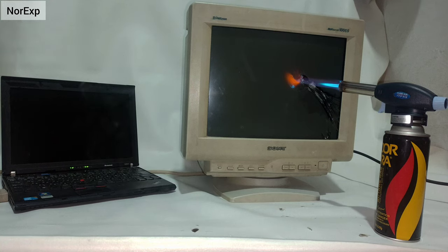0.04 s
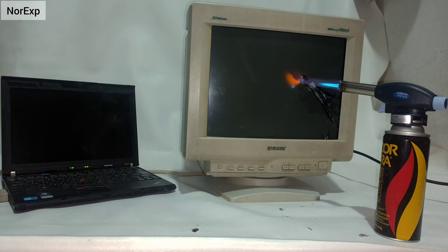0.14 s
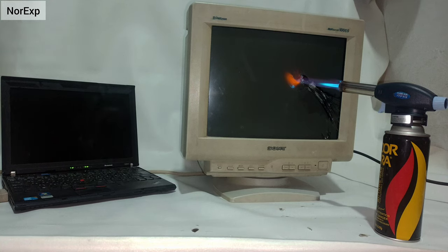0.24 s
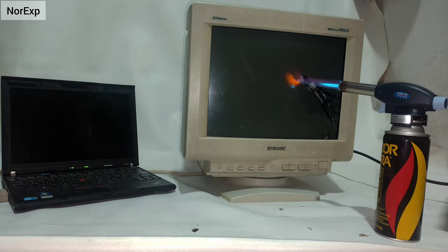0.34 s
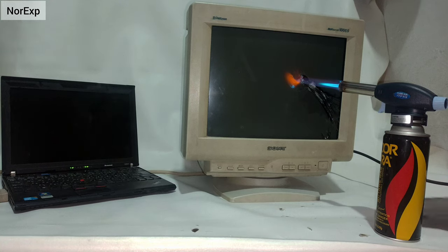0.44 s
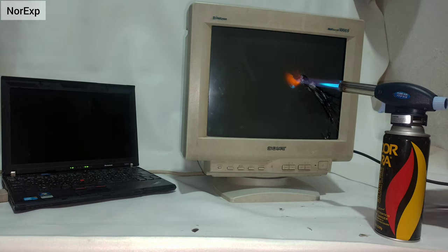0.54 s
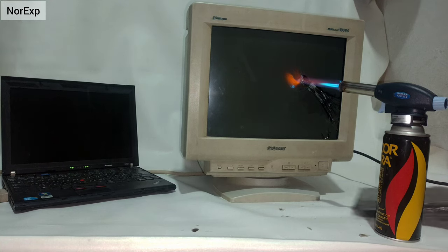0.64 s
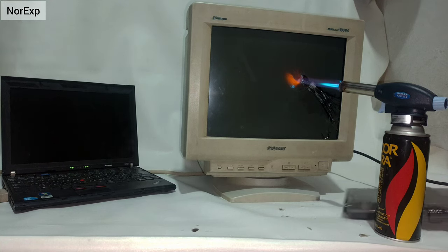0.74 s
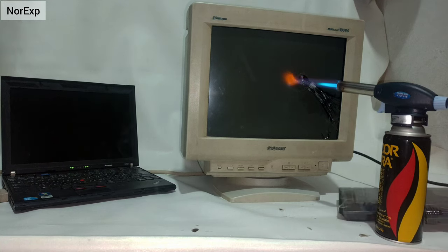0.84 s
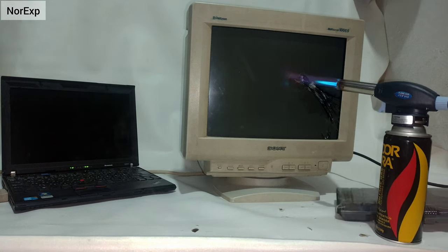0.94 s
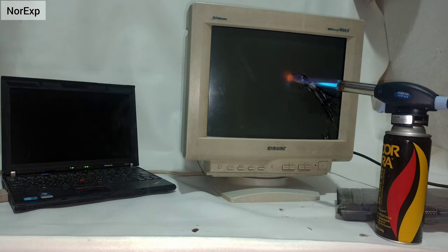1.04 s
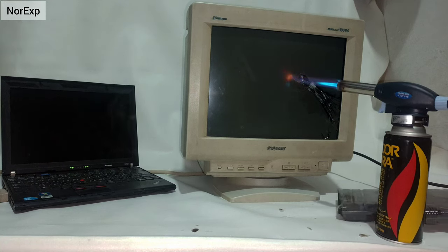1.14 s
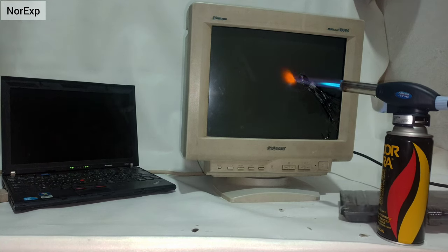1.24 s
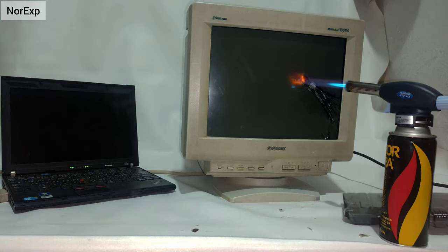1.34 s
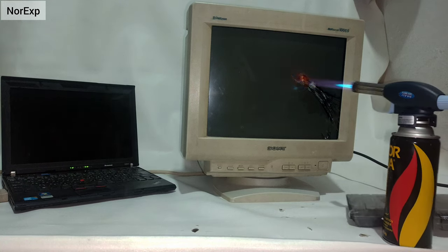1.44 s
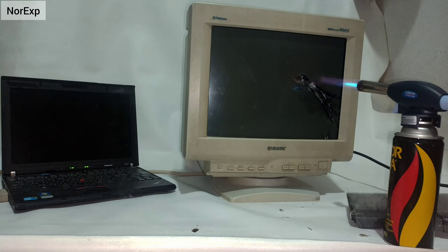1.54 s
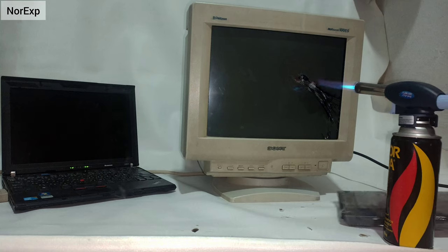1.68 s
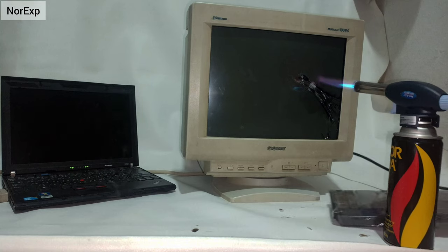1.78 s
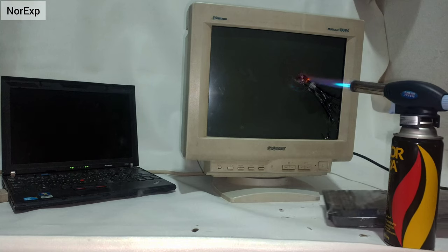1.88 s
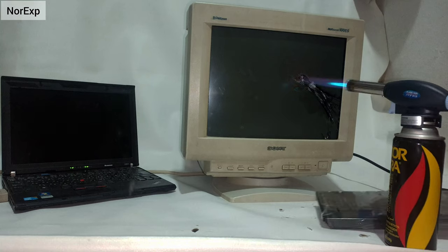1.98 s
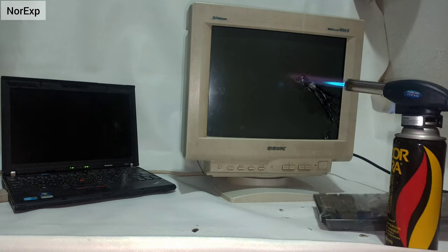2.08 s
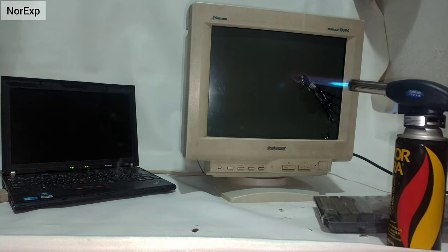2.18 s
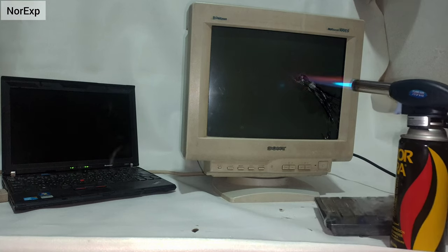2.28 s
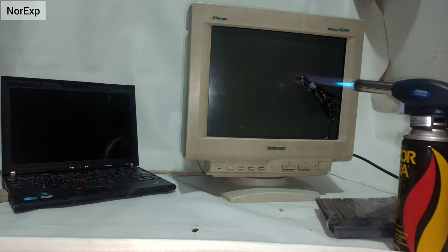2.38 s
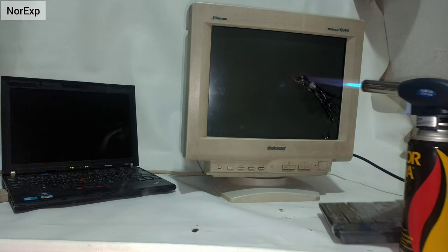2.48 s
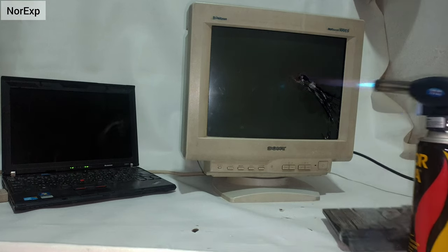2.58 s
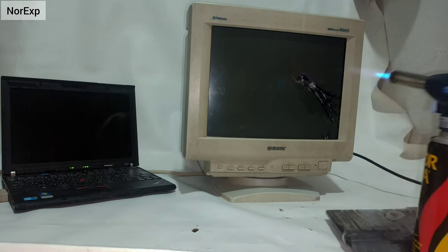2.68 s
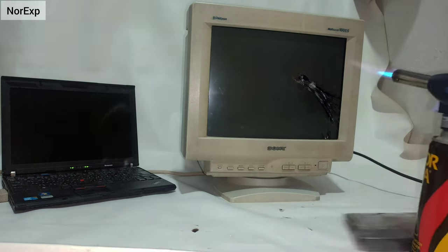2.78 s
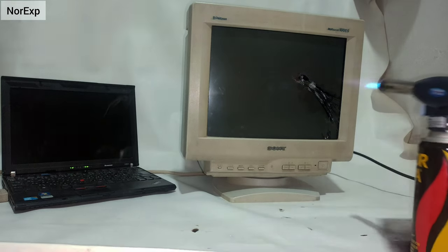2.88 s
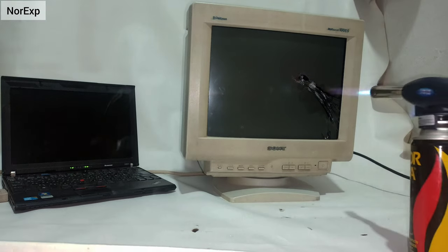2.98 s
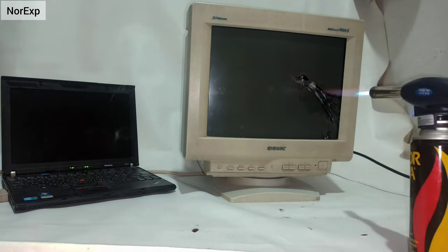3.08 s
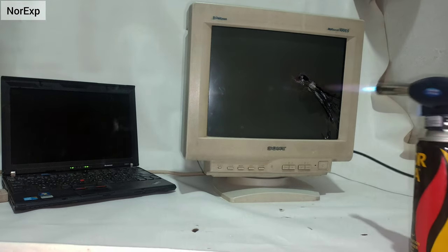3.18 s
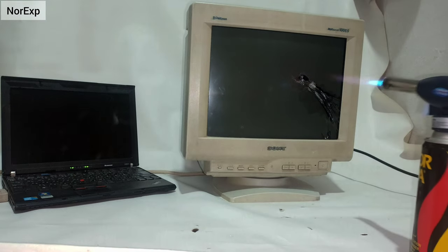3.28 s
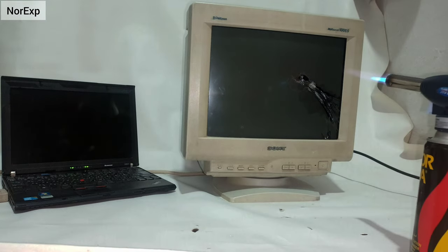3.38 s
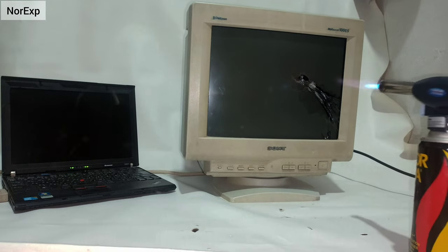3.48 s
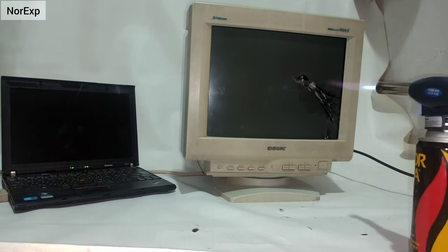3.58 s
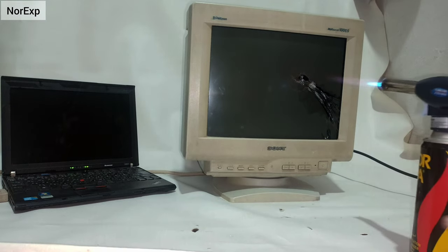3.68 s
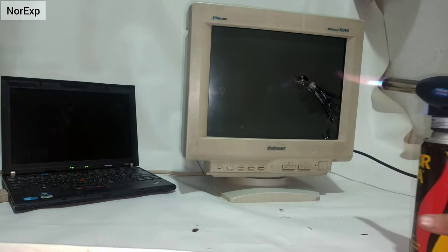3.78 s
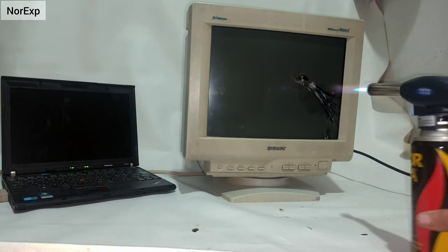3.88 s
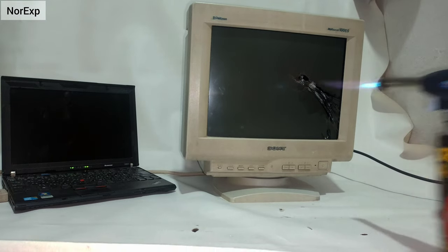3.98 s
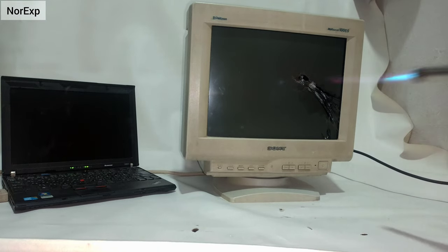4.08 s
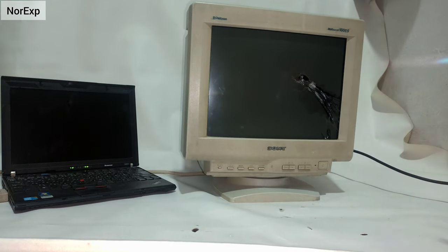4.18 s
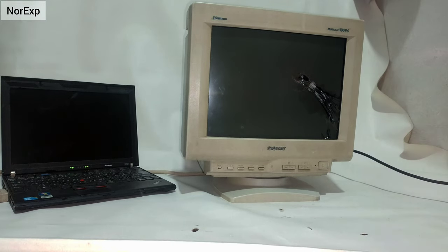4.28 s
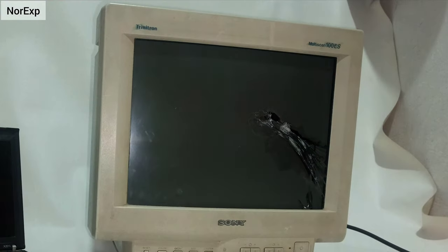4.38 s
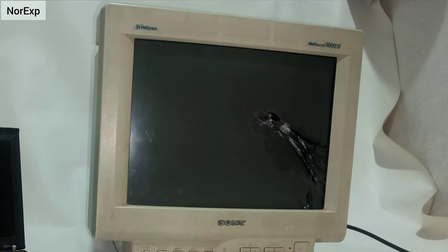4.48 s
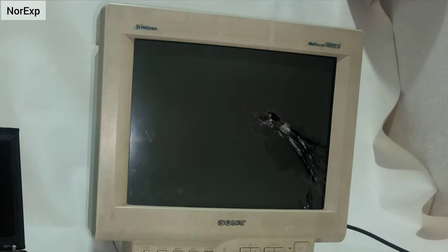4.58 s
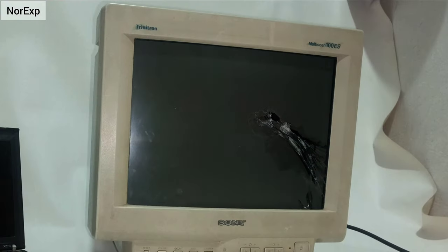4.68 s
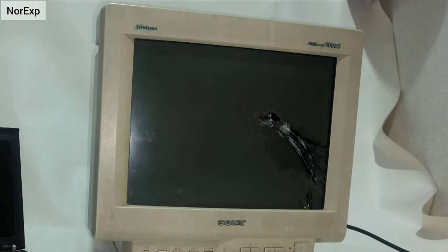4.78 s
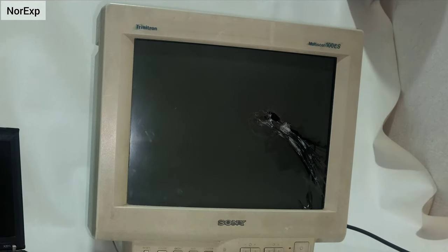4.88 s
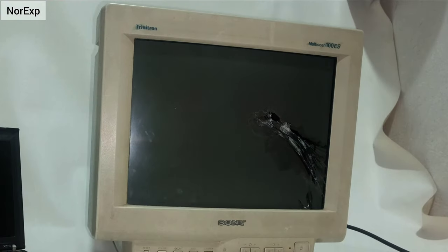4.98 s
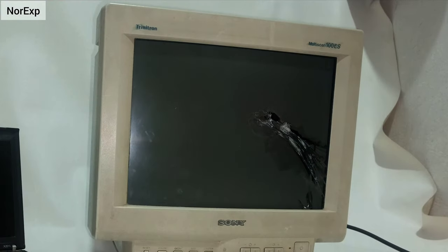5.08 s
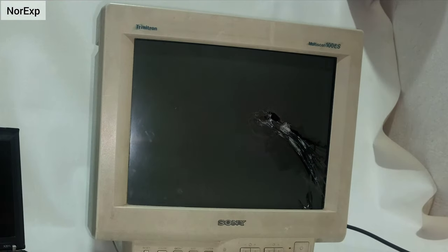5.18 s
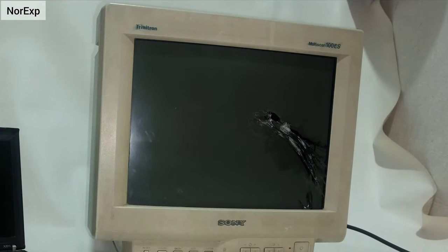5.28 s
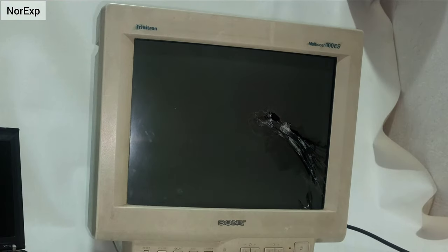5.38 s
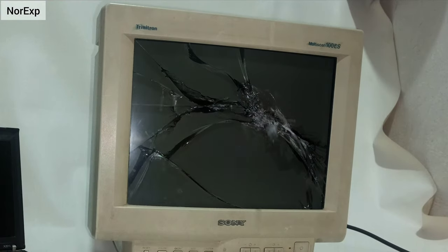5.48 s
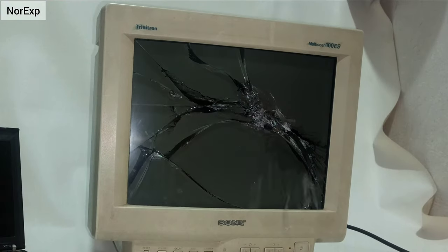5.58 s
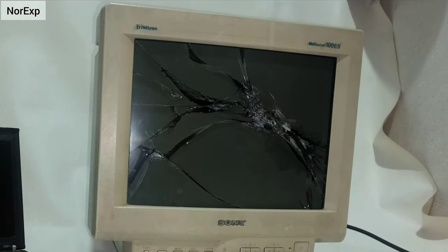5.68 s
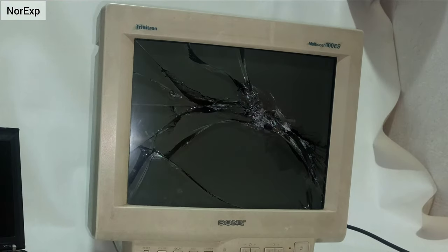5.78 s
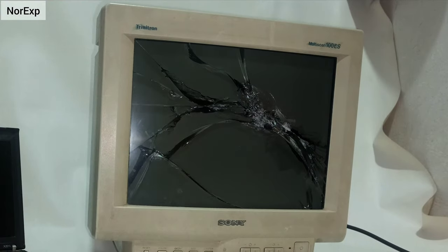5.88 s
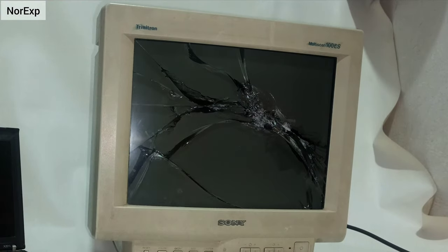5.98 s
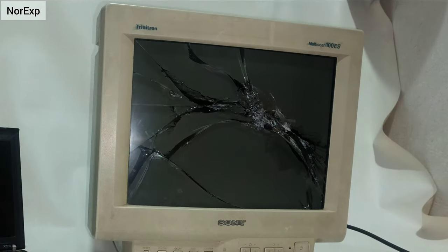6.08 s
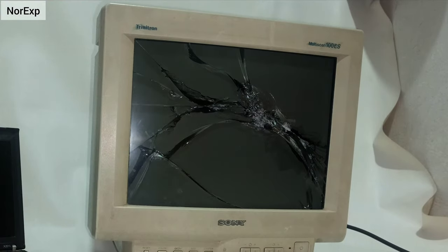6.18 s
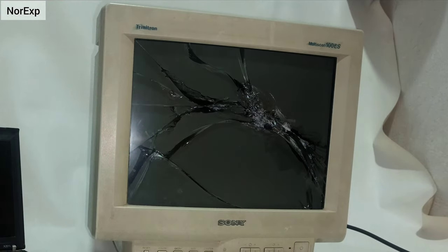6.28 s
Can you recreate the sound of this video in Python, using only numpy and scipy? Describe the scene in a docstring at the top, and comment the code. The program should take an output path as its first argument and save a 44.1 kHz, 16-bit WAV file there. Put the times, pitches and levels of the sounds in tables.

```python
"""One microphone in a small room. A butane torch roars and hisses 12 cm from the screen of a picture tube.
A soft handling knock, then the heated glass pings. The torch draws back to 32 cm amid ticks and clicks
of hot glass and handled torch. At 4.3 s the gas is shut off, leaving a low rumble and a few faint ticks.
At 5.5 s the screen bursts with a snap and a thud, air rushes into the vacuum and splinters rattle
inside the tube. At 6.1 s the screen cracks again."""
import sys
import numpy as np
from scipy import signal
from scipy.fft import rfft, irfft, next_fast_len
from scipy.io import wavfile
from scipy.ndimage import map_coordinates

SR = 44100
rng = np.random.default_rng(int(sys.argv[2]) if len(sys.argv) > 2 else 0)


def digitize_waveform(pressure):
    """Quantize a signal to 16-bit integers and store it at the path in sys.argv[1].

    Rows of a 2-D input are taken as channels; values are limited to [-1, 1].
    """
    field = np.atleast_2d(pressure).T
    bounded = np.clip(field, -1, 1)
    quanta = np.round(bounded * 32767).astype(np.int16)
    wavfile.write(sys.argv[1], SR, quanta)


N = 279594
TIME = np.arange(N) / SR
HIT = np.arange(SR) / SR  # seconds since a blow
SOUND_M_PER_S = 343


def amp(db):
    """Decibels to gain."""
    return 10 ** (np.asarray(db) / 20)


def unit(x):
    """Scale to rms 1."""
    return x / np.sqrt(np.mean(x ** 2) + 1e-20)


def along(points, hz):
    """Read (freq_hz, value) points on a log frequency axis."""
    freqs, values = np.transpose(points)
    return np.interp(np.log(hz + 1), np.log(freqs + 1), values)


def curves(rows):
    """One value per sample for each column after the time."""
    times, *columns = np.transpose(rows)
    return [np.interp(TIME, times, column) for column in columns]


def wobble(rate):
    """A smooth random curve, rate knots a second."""
    return map_coordinates(rng.standard_normal(int(N * rate / SR) + 4), [TIME * rate])


def bell(centre_s, half_s):
    """A smooth rise and fall around a moment."""
    return np.exp(-((TIME - centre_s) / half_s) ** 2)


def fade(t60):
    """A decay of 60 dB in t60 seconds."""
    return np.exp(-np.log(1000) * HIT / t60)


def filtered(x, response):
    """Shape x by a gain that depends on frequency."""
    size = next_fast_len(len(x) + 8192)
    return irfft(rfft(x, size) * response(np.fft.rfftfreq(size, 1 / SR)), size)[:len(x)]


def lifts(peaks, hz):
    """The dB that resonances add at each frequency."""
    return sum(db / (1 + (2 * (hz - centre) / width) ** 2) for centre, width, db in peaks)


def noise(colour, peaks=(), size=N):
    """Noise of rms 1; the levels in colour and peaks only shape its spectrum."""
    white = rng.standard_normal(size)
    return unit(filtered(white, lambda hz: amp(along(colour, hz) + lifts(peaks, hz))))


def burst(colour, t60, attack_s=0.00024):
    """A blow that rings a dense cluster of quickly dying modes."""
    envelope = fade(t60) * (1 - np.exp(-HIT / attack_s))
    return unit(noise(colour, size=SR) * envelope) * np.sqrt(np.mean(envelope ** 2))


def specks(rate, colour, t60, scatter_db=6):
    """A random patter of tiny blows, rate a second; rms 1."""
    blows = (rng.random(N) < rate / SR) * amp(scatter_db * rng.uniform(-1, 1, N))
    energy = signal.fftconvolve(blows ** 2, fade(t60) ** 2)[:N]
    return unit(noise(colour) * np.sqrt(np.abs(energy)))


def add(track, start_s, sound):
    """Mix a sound into the track."""
    start = round(start_s * SR)
    track[start:start + len(sound)] += sound[:N - start]


def delayed(x, seconds):
    """x heard after a changing delay."""
    return map_coordinates(x, [(TIME - seconds) * SR], order=3)


# The nozzle's distance from the screen: time_s, distance_m
RETREAT = [(.8, .123), (1.05, .16), (1.4, .158), (1.9, .167), (2.25, .191), (2.45, .22), (2.8, .245),
           (3.55, .247), (4, .26), (4.35, .32)]

def torch(on_glass_m=0.15, clear_m=0.237, gas_off_s=4.348):
    """Flame and gas jet draw back from the glass together, until the closing valve cuts both."""
    distance, = curves(RETREAT)
    drawn_back = distance - distance.min()
    free = np.clip((distance - on_glass_m) / (clear_m - on_glass_m), 0, 1)  # 0 on the glass, 1 clear
    valve = np.clip((gas_off_s - TIME) / 0.0016, 0, 1)
    return (flame(drawn_back, free) + gas_jet(distance, drawn_back, free)) * valve


# Spectra of the flame on the glass, in open air, and at its tip: freq_hz, level_db
FLAME_ON_GLASS = [(24, -56.5), (40, -28.5), (140, -18.5), (188, -9.5), (281, -3.5), (316, -9.5), (367, -2),
                  (459, 1), (557, -6), (665, -3.5), (832, -10.5), (909, -21), (1020, -9), (1240, -42.5),
                  (1400, -19.5), (1820, -42), (3080, -120)]
FLAME_FREE = [(24, -57), (40, -29.5), (108, -13), (167, -13), (209, -4), (277, -3), (312, -10), (367, 1),
              (413, -5), (487, -0.5), (557, -13.5), (728, -10.5), (857, -11.5), (951, -12), (1400, -21.5),
              (1820, -43), (3080, -120)]
FLAME_TIP = [(400, -31), (800, -2), (1300, -3.5), (2400, -10.5), (4200, -3), (6000, -24), (12000, -47.5)]

def flame(drawn_back, free, roar_db=-35, fall_db_per_m=31, tip_db=-53):
    """The turbulent flame roars, fuller while it spreads on the glass; once free, its tip rushes."""
    spread = np.sqrt(1 - free) * noise(FLAME_ON_GLASS)
    in_open = np.sqrt(free) * noise(FLAME_FREE, peaks=[(366, 34, 2.9), (854, 34, 5.5)])
    flutter_db = 1.31 * wobble(24.93) + 0.69 * wobble(4)
    roar = (spread + in_open) * amp(roar_db - fall_db_per_m * drawn_back + flutter_db)
    return roar + free * noise(FLAME_TIP) * amp(tip_db)


# Spectrum of the gas jet: freq_hz, level_db
JET = [(600, -29.5), (1200, -1), (1800, 3), (3000, -3), (4000, -5.5), (5000, 1.5), (5900, -4), (6900, -2),
       (7600, -12.5), (8500, -7), (9600, -12.5), (10300, -19), (13700, -28), (16000, -23)]
# Resonances of the burner tube: centre_hz, width_hz, lift_db
BURNER = [(3104, 340, 5), (6490, 660, 7.5), (9490, 370, 10.5), (11200, 1000, 9.5)]
# A glancing echo off a surface close to the nozzle: time_s, delay_s, gain
GLANCE = [(.8, .000316, .36), (1.4, .000335, .25), (1.62, .000308, .3), (2.1, .00031, .15),
          (2.7, .00035, .03), (4, .00039, .05), (4.12, .00042, .26), (4.3, .00049, .38)]

def gas_jet(distance, drawn_back, free, hiss_db=-41.5, rise_db_per_m=2.5, screen_echo=0.24):
    """Gas hisses through the burner tube, louder and brighter as it comes out into the open."""
    jet = noise(JET, BURNER)
    treble = filtered(jet, lambda hz: 1 - 1 / (1 + (hz / 8000) ** 8))
    jet = jet + treble * (amp(-3 * (1 - free)) - 1)  # the nearby glass shades the treble
    # Moving echoes sweep comb notches through the hiss at the microphone.
    glance_delay, glance_gain = curves(GLANCE)
    round_trip = 2 * distance / SOUND_M_PER_S
    jet = jet + glance_gain * delayed(jet, glance_delay) - screen_echo * delayed(jet, round_trip)
    jet = unit(jet + wall_echoes(jet, distance))
    return jet * amp(hiss_db + rise_db_per_m * drawn_back + 0.55 * wobble(30))


def wall_echoes(x, distance, gain=0.14):
    """Ten echoes off the table and walls; their paths drift as the torch moves and the hand sways."""
    echoes = np.zeros(N)
    for delay_s, lean in rng.uniform([0.002, -0.6], [0.022, 0.6], size=(10, 2)):
        drift_m = lean * distance + 0.004 * wobble(2)
        echoes += gain * delayed(x, delay_s + drift_m / SOUND_M_PER_S)
    return echoes


# Spectra of the room's rumble and thin air: freq_hz, level_db
RUMBLE = [(25, -23), (50, -8), (80, -8), (120, 0.5), (160, -5.5), (220, -17.5), (350, -26), (700, -57.5)]
AIR = [(180, -39.5), (300, -6.5), (532, -11), (587, -4.5), (738, -14.5), (1210, -17), (1310, -14.5),
       (1540, -16), (15000, -34)]
# Faint tones in the room air: centre_hz, width_hz, lift_db
DRONE = [(605, 40, 12.5), (1330, 20, 16)]

def room_tone(rumble_db=-65, air_db=-71, tone_hz=665, tone_db=-66, dip_db=-11.5):
    """An uneven rumble and faintly droning air; a tone swells once, then the level dips briefly."""
    rumble = noise(RUMBLE, peaks=[(116, 20, 3.4)]) * amp(rumble_db + 3 * wobble(18))
    air = noise(AIR, DRONE) * amp(air_db + 1.2 * wobble(12))
    tone = np.sin(2 * np.pi * tone_hz * TIME + wobble(50)) * bell(4.57, half_s=0.08) * amp(tone_db)
    return (rumble + air) * amp(dip_db * bell(4.94, half_s=0.1)) + tone


# Reverberation of the small room: freq_hz, t60_s
ROOM = [(150, 0.068), (1000, 0.23), (5000, 0.19), (14000, 0.15)]

def in_room(sound, wet_db):
    """A short sound reaches the microphone directly, followed by its own diffuse room tail."""
    hz, t, spectrum = signal.stft(rng.standard_normal(SR // 2), SR, nperseg=256)
    decay = np.exp(-np.log(1000) * t / along(ROOM, hz)[:, None])
    tail = signal.istft(spectrum * decay, SR, nperseg=256)[1]
    tail = tail * (1 - np.exp(-HIT[:len(tail)] / 0.001))
    return sound + amp(wet_db) * signal.fftconvolve(sound, tail / np.linalg.norm(tail))[:len(sound)]


# Spectrum of a hollow clack, shared with ticks and splinters: freq_hz, level_db
CLACK = [(200, -22.5), (550, -14.5), (850, -3.5), (1250, -2), (2000, -7.5), (2800, -14.5), (6000, -24),
         (16000, -50)]
# Handling knocks on the torch and gear: peak_s, level_db, pitch_hz, half_length_s
KNOCKS = [(0.675, -19, 250, 0.0033), (3.067, -30.5, 430, 0.0043), (3.273, -25, 1500, 0.00045),
          (3.369, -24.5, 1450, 0.00087), (3.653, -28, 1100, 0.0008), (4.743, -54, 110, 0.018),
          (5.014, -59.5, 230, 0.0095), (5.465, -71, 442, .018)]

def knocks(scuff_gain=0.36, lead_s=0.05):
    """Each soft contact swells and dies in a few cycles, with a scuff that is duller for low ones."""
    track = np.zeros(N)
    for peak_s, level_db, pitch_hz, half_length_s in KNOCKS:
        swell = np.exp(-((HIT - lead_s) / half_length_s) ** 2)
        scuff = filtered(noise(CLACK, size=SR), lambda hz: 1 / (1 + (hz / (5 * pitch_hz)) ** 4))
        knock = swell * (np.sin(2 * np.pi * pitch_hz * HIT) + scuff_gain * scuff)
        add(track, peak_s - lead_s, amp(level_db) * in_room(knock, wet_db=-3))
    return track


# Spectra of a hard snap, a small tick and its sharp edge: freq_hz, level_db
SNAP = [(350, -17), (700, -8.5), (1200, -4), (2200, -2), (2800, -9), (4000, -4), (6000, -1), (8500, -9.5),
        (10500, -19.5), (13000, -26.5), (16000, -28)]
TICK = [(1500, -5), (2500, -3), (4500, -1), (6800, -3), (9300, -4.5), (11000, -19.5), (14000, -22.5),
        (16000, -22)]
GLINT = [(4000, -30), (7500, -5), (9300, -5), (12500, 0), (16000, -9)]
# Modes of the unbroken tube: pitch_hz, level_db, t60_s
TUBE_MODES = [(1012, -30.5, 1), (2887, -32, 0.47), (2892, -38.5, .3), (2980, -36, 0.3), (3860, -38, 0.14),
              (3950, -33, 0.34), (4400, -34.5, 0.3), (5020, -42, 0.37), (6300, -41, 0.38),
              (7600, -38.5, 0.22)]

def ping(start_s=0.8445, snap_db=-31):
    """An early heat crack sets the whole tube ringing; close modes beat against each other."""
    track = np.zeros(N)
    ring = sum(amp(level_db) * fade(t60_s) * np.sin(2 * np.pi * (pitch_hz * HIT + rng.random()))
               for pitch_hz, level_db, t60_s in TUBE_MODES)
    snap = 0.7 * burst(SNAP, t60=0.15) + burst(TICK, t60=0.34) + 0.14 * burst(GLINT, t60=0.15)
    add(track, start_s, in_room(ring, wet_db=-10.5) + amp(snap_db) * snap)
    return track


# Ticks of hot glass and handled torch, levels relative: start_s, level_db, body_db, glint_db
TICKS = [(1.5272, -22.5, -1.5, -23), (2.8567, -17.5, -21, -16), (2.9566, -22.5, 3, -12),
         (3.1138, -16.5, -5, -24), (3.1338, -20.5, -18, -17), (3.1992, -17.5, -6, -18),
         (4.0303, -22.5, 1, -18), (4.5342, -43, -32, -14), (4.5685, -51, -24, -12), (4.6843, -56, -15, -12),
         (5.006, -45.5, -3, -24), (5.0658, -49.5, -25, -16), (5.1775, -48.5, -22, -13),
         (5.2555, -42, -9, -18), (5.672, -16, -4, -16), (6.316, -39, -6, -9)]

def ticks(patter_per_s=95, patter_db=-52):
    """Small sharp ticks and clicks of the hot glass and the handled torch; a faint patter around 3 s."""
    patter = specks(patter_per_s, TICK, t60=0.0087) * bell(3.08, half_s=0.2)
    track = amp(patter_db) * in_room(patter, wet_db=3)
    for start_s, level_db, body_db, glint_db in TICKS:
        body = amp(body_db - 3) * burst(CLACK, t60=0.011)
        glint = amp(glint_db + 3) * burst(GLINT, t60=0.0049)
        tick = burst(TICK, t60=0.01) + body + glint
        add(track, start_s, amp(level_db - 4.5) * in_room(tick, wet_db=-1))
    return track


# Spectrum of the hollow case: freq_hz, level_db
THUD = [(25, -25), (100, -7), (250, -8), (380, 1.5), (600, 2.5), (1200, -9), (2500, -48)]
# Splits of the screen: start_s, snap_db, thud_db, thud_hz, thud_t60_s
FRACTURES = [(5.529, -10.5, -10.5, 446, 0.071), (6.1156, -16, -20, 479, 0.092)]

def fractures(run_on_s=0.0052):
    """Each split is a hard snap, a smaller one as the crack runs on, and the screen's thud on the case."""
    track = np.zeros(N)
    for start_s, snap_db, thud_db, thud_hz, thud_t60_s in FRACTURES:
        snap = burst(SNAP, t60=0.015, attack_s=0.0001) + 0.21 * burst(SNAP, t60=0.033)
        tone = np.sin(2 * np.pi * thud_hz * HIT) * fade(thud_t60_s) * (1 - np.exp(-HIT / 0.0017))
        thud = tone + 0.5 * burst(THUD, t60=0.074, attack_s=0.0018)
        add(track, start_s, amp(snap_db) * in_room(snap, wet_db=-3.5))
        add(track, start_s, amp(thud_db) * in_room(thud, wet_db=-14))
        add(track, start_s + run_on_s, amp(snap_db - 8) * burst(SNAP, t60=0.008))
    return track


# Spectrum of air drawn into the broken tube: freq_hz, level_db
INRUSH = [(35, -45), (60, -10), (256, 2), (338, -3.5), (515, 5), (715, -8.5), (946, -5), (1090, -2),
          (1380, -6.5), (3340, -1), (6900, -7.5), (12700, -33), (16000, -40)]

def inrush(gasp_db=-26.5, attack_s=0.0096, fill_s=0.22, settle_db=-32.5, fall_db_per_s=61):
    """The vacuum fills in a gasp that dies as pressure evens out; glass dust crackles and settles."""
    since = np.maximum(TIME - FRACTURES[0][0], 0)
    onset = 1 - np.exp(-since / attack_s)
    flow = amp(gasp_db) * np.clip(1 - since / fill_s, 0, 1)
    settling = amp(settle_db - fall_db_per_s * since) + amp(-63.5)  # a faint rustle stays
    draught = noise(INRUSH) * amp(0.5 * wobble(400))
    dust = amp(-11) * specks(250, SNAP, t60=0.003)
    return (draught + dust) * np.maximum(flow, settling) * onset


# The biggest splinters striking the tube: start_s, level_db
SPLINTERS = [(5.7149, -24.5), (5.7351, -21.5), (5.742, -23), (5.7576, -24), (5.768, -23), (5.775, -23),
             (5.904, -34.5), (5.935, -39.5), (5.992, -44.5)]

def splinters(shower_s=5.77, click_db=-3, shower_fall_db_per_s=260, trickle_fall_db_per_s=30):
    """Glass clicks and clacks inside the hollow tube: big splinters in a shower that thins to a trickle."""
    def chips(per_s):
        return unit(specks(per_s, CLACK, t60=0.021) + amp(click_db) * specks(per_s, TICK, t60=0.014))

    since = np.maximum(TIME - shower_s, 0)
    swell = np.where(TIME < shower_s, bell(shower_s, half_s=0.025), 1)
    shower = chips(per_s=380) * amp(-32 - shower_fall_db_per_s * since)
    trickle = chips(per_s=60) * amp(-48 - trickle_fall_db_per_s * since)
    track = in_room(swell * (shower + trickle), wet_db=-7)
    for start_s, level_db in SPLINTERS:
        strike = burst(CLACK, t60=0.023) + amp(click_db) * burst(TICK, t60=0.012)
        add(track, start_s, amp(level_db) * in_room(strike, wet_db=-4.5))
    return track


def scene():
    """Torch, room and glass, all heard from one microphone position."""
    heating = torch() + room_tone() + knocks() + ping() + ticks()
    breaking = fractures() + inrush() + splinters()
    return (heating + breaking)[None]


def record(dry):
    """The microphone sheds deep bass, rounds off big peaks and resonates just under its band limit."""
    low_cut_hz, ceiling, top_hz = 38, 0.85, 15650
    resonance = [(15250, 1400, 10)]  # centre_hz, width_hz, lift_db
    x = signal.sosfilt(signal.butter(3, low_cut_hz, "high", fs=SR, output="sos"), dry[0])
    x = x / (1 + np.abs(x / ceiling) ** 4) ** (1 / 4)
    x = filtered(x, lambda hz: amp(lifts(resonance, hz)))
    return filtered(x, lambda hz: 1 / np.sqrt(1 + (hz / top_hz) ** 300))[None]


dry = scene()
out = record(dry)
digitize_waveform(out)
```